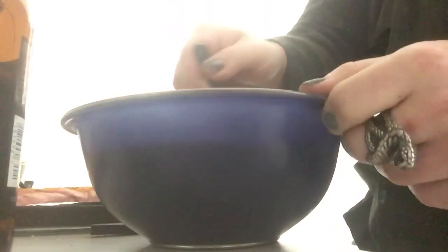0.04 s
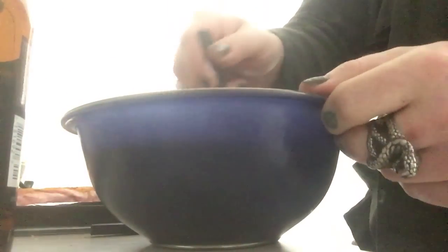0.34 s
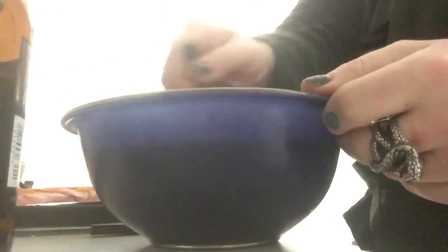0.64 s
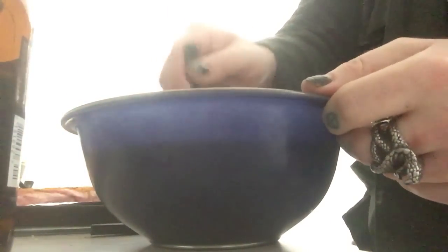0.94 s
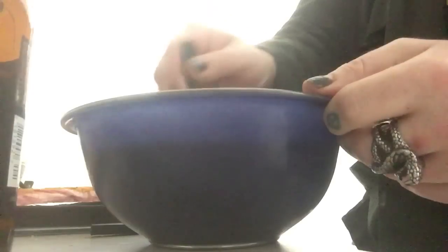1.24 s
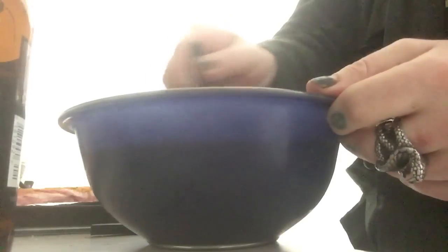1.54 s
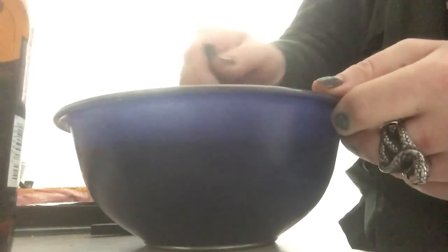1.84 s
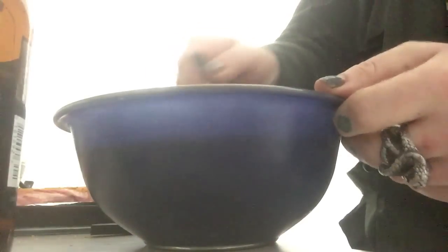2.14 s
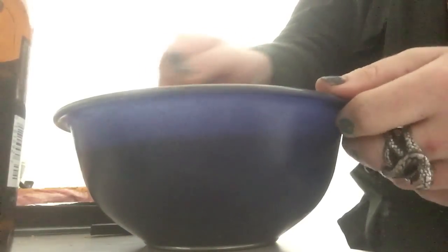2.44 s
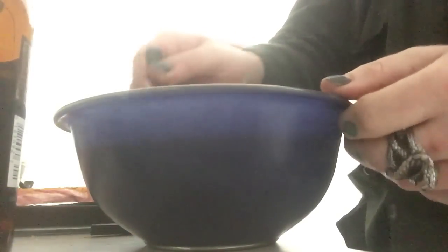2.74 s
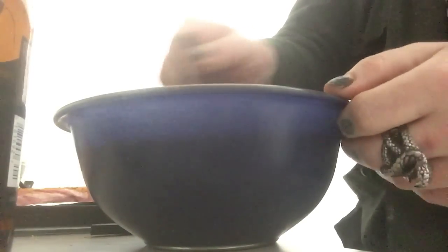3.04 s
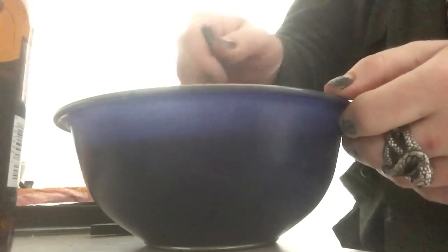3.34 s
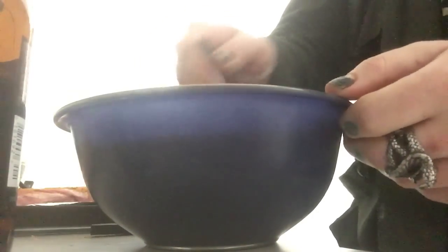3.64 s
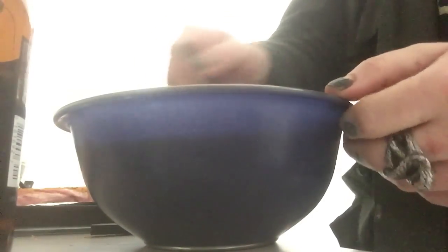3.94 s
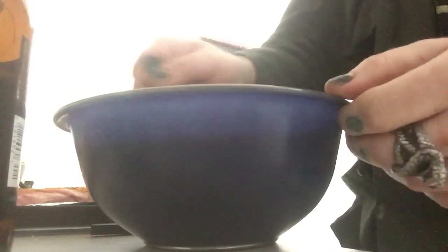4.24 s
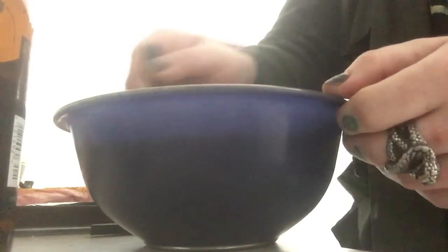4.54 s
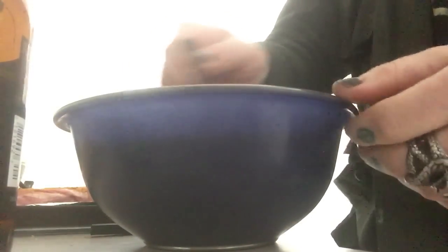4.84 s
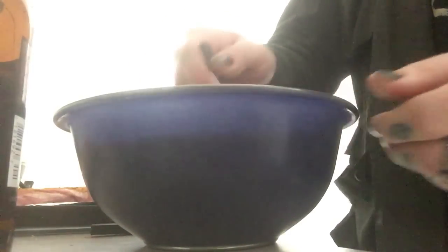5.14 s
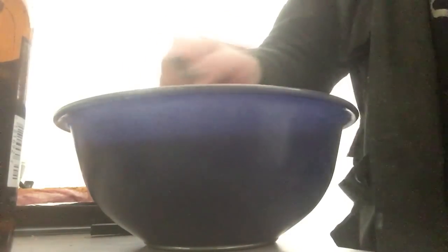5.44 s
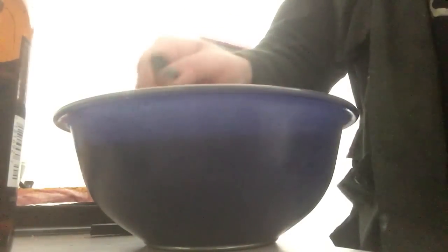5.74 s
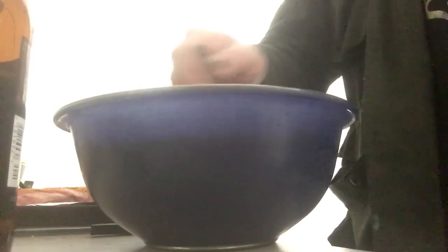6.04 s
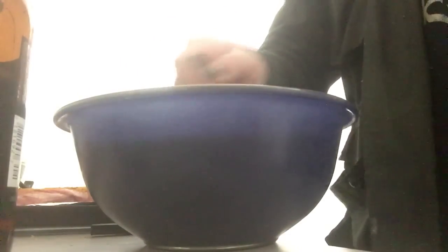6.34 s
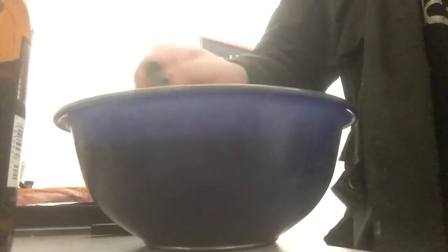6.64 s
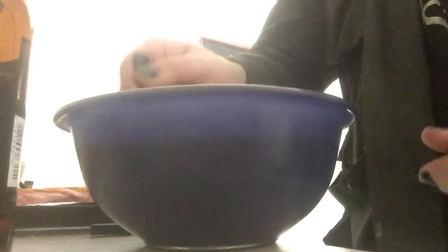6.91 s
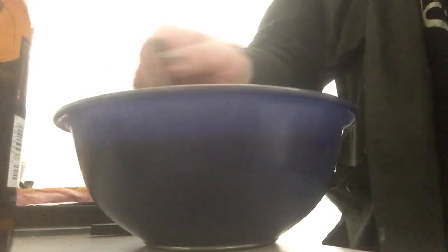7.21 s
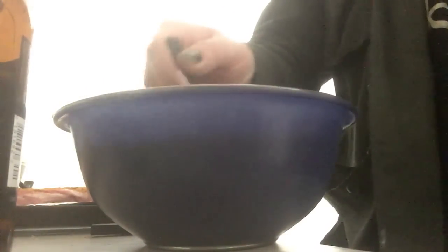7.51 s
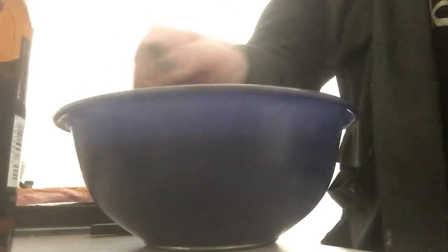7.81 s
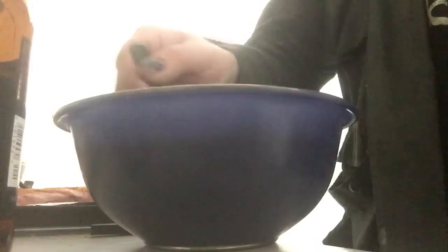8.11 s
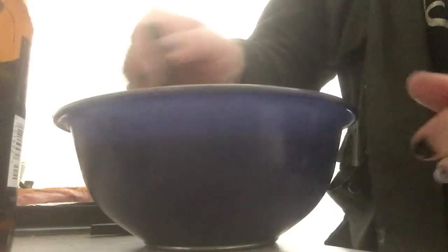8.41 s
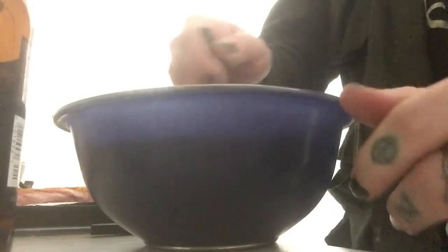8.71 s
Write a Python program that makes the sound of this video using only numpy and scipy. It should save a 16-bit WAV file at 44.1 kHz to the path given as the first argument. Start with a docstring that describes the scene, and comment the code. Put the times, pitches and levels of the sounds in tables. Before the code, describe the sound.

A metal utensil stirs sauce in a plastic mixing bowl, close to the microphone in a small kitchen. A few faint taps come first, then the level jumps and the utensil knocks unevenly against the wall several times a second. Soft wet scrapes run between the knocks, and the bowl thumps lightly on the counter. Later the knocks get a little deeper and sparser, with small plops, over a faint appliance hum.

```python
"""A metal utensil stirs sauce in a plastic mixing bowl on a kitchen counter, close to the microphone.
Several times a second it knocks on the wall, then drags through the wet sauce, slowing as it goes.
The bowl thumps on the counter, air pockets plop and the sauce pops wetly. Behind it an appliance
hums in the small room. Everything is faint at first, until the level steps up."""
import sys
import numpy as np
from scipy import signal
from scipy.fft import rfft, irfft
from scipy.io import wavfile

SR = 44100
rng = np.random.default_rng(int(sys.argv[2]) if len(sys.argv) > 2 else 0)


def dump(signal):
    """Clip the signal to [-1, 1] and save it as 16-bit WAV at the path in sys.argv[1]."""
    limited = np.clip(np.atleast_2d(signal).T, -1, 1)
    pcm = np.round(limited * 32767).astype(np.int16)
    wavfile.write(sys.argv[1], SR, pcm)


N = 386757
TIME = np.arange(N) / SR
AGE = np.arange(SR // 3) / SR  # seconds into one short sound
LEVEL_STEP_S = 1.36  # the level steps up and the drag becomes audible

# The bowl's wall ringing on after a blow. Each row: pitch in Hz, level in dB, t60 in seconds.
WALL_RING = [(690, -29, 0.092), (840, -43.5, 0.058), (1066, -12, 0.033), (1156, -10.5, 0.032),
             (1213, -33.5, 0.08), (1430, -29, 0.1), (2160, -61, 0.11)]
# The tone of the rubbed wall. Each row: frequency in Hz, relative level in dB.
RUB_SPECTRUM = [(100, -36), (250, -5), (500, -4.5), (700, 4.5), (950, 5.5), (1200, 4.5), (1550, -5.5),
                (2200, -7.5), (3500, -17), (7000, -53.5)]


def gain_of(db):
    """Decibels to amplitude."""
    return 10 ** (np.asarray(db) / 20)


def unit_rms(x):
    """Scales to rms 1."""
    return x / np.sqrt(np.mean(x ** 2) + 1e-20)


def value_at(points, hz):
    """Reads a table on a log-frequency axis."""
    freqs, values = np.transpose(points)
    return np.interp(np.log(hz + 1), np.log(freqs + 1), values)


def add(mix, start_s, sound):
    """Mixes a sound in at its start time."""
    part = mix[max(round(start_s * SR), 0):][:len(sound)]
    part += sound[:len(part)]


def colour(x, spectrum, size=4096):
    """Causal filter of unit energy, so that clicks keep their sharp front."""
    log_gain = np.log(gain_of(value_at(spectrum, abs(np.fft.fftfreq(size, 1 / SR)))))
    minimum_phase = np.exp(np.conj(signal.hilbert(log_gain)))
    response = np.fft.ifft(minimum_phase).real[:size // 2]
    return signal.oaconvolve(x, response / np.linalg.norm(response))[:len(x)]


def drift(below_hz):
    """A random wander of rms 1."""
    band = np.fft.rfftfreq(N, 1 / SR) < below_hz
    return unit_rms(irfft(rfft(rng.standard_normal(N)) * band, N))


def grains(per_s, spread_db):
    """Random tiny clicks, most weak and a few strong."""
    size = gain_of(spread_db * np.minimum(rng.exponential(1, N), 4))
    return unit_rms(size * rng.choice([-1, 1], N) * (rng.random(N) < per_s / SR))


def room_tone():
    """Kitchen air and a wavering appliance hum, both faint at first, over a steady hiss."""
    # The air of the room. Each row: frequency in Hz, relative level in dB.
    air_spectrum = [(20, -41), (40, 2.5), (70, 13), (135, -3.5), (190, -10.5), (320, -12), (600, -5),
                    (1150, -39), (1700, -32), (3300, -23), (5000, -30.5), (9000, -34.5), (11000, -35.5),
                    (16000, -36)]
    # The appliance. Each row: pitch in Hz, rms level in dB after the step up.
    hum_tones = [(59.6, -57), (129.5, -64)]
    air = gain_of(-56.5) * unit_rms(colour(rng.standard_normal(N), air_spectrum))
    hum = sum(gain_of(db) * np.sqrt(2) * np.sin(2 * np.pi * hz * TIME + 0.56 * drift(8.5))
              for hz, db in hum_tones)
    step_db = np.interp(TIME, [LEVEL_STEP_S, LEVEL_STEP_S + 0.0049], [-22, 0])
    hiss = gain_of(-79) * colour(rng.standard_normal(N), [(1200, 1), (4000, -8), (16000, -20)])
    return (air + hum) * gain_of(step_db) + hiss


def ring(modes, rise_cycles, detune=0):
    """Dying modes swell over their first cycles, so deep ones lag; the spot struck shifts their levels."""
    stretch = 1 + detune * rng.standard_normal() if detune else 1
    out = 0
    for (hz, db, t60), spot_db in zip(modes, rng.standard_normal(len(modes))):
        turns = hz * stretch * AGE
        swell = 1 - np.exp(-(turns / rise_cycles) ** 2)
        out = out + gain_of(db + spot_db - 60 * AGE / t60) * swell * np.sin(2 * np.pi * turns)
    return out


def wall_knock(centre_hz, focus_db_per_octave=13):
    """A few cycles of the wall: the depth of the blow picks out the modes near one pitch."""
    # The wall, heavily damped by sauce. Each row: pitch in Hz, level in dB, t60 in seconds.
    damped_wall = [(321, -10.5, 0.018), (679.6, 1.5, 0.011), (805.5, -1, 0.017), (1156, -2, 0.015)]
    modes = []
    for hz, db, t60 in damped_wall:
        octaves_away = min(abs(np.log2(hz / centre_hz)), 0.7)
        modes.append((hz, db - focus_db_per_octave * octaves_away, t60))
    wave = ring(modes, rise_cycles=0.95, detune=0.015)
    return wave / abs(wave).max()


def contact(snap_s, buzz_db, buzz_s):
    """Noise of hard contact: a first snap, then a weaker buzz."""
    envelope = np.exp(-AGE / snap_s) + gain_of(buzz_db) * np.exp(-AGE / buzz_s)
    return envelope * rng.standard_normal(len(AGE))


def utensil_taps():
    """Each blow gives a ringing knock, a crack of metal on plastic and a thump through the counter."""
    # Utensil meets bowl. Each row: start in seconds, level in dB, centre of the knock in Hz,
    # hardness in dB (the strength of the metal tick, low where sauce cushions the blow).
    blows = [(.158, -37, 1160, -23), (.433, -53.5, 1130, -36), (0.597, -55.5, 1080, -12),
             (.858, -39.5, 1230, -18), (.962, -43, 1160, -32), (1.101, -44, 1070, -32),
             (1.221, -40, 1220, -22.5), (1.26, -45, 1150, -35), (1.286, -52, 1120, -49),
             (1.369, -12, 980, -24.5), (1.505, -21.5, 1150, -41), (1.531, -16.5, 1060, -32.5),
             (1.721, -18.5, 890, -24.5), (1.791, -32, 1050, -54), (1.866, -12, 1240, -21),
             (1.978, -23, 1050, -24), (2.048, -26.5, 1080, -35), (2.177, -40, 900, -22),
             (2.234, -22, 1000, -21), (2.302, -21.5, 1050, -21), (2.372, -12.5, 1040, -21),
             (2.515, -21, 920, -21.5), (2.61, -20.5, 1080, -25), (2.666, -24.5, 1100, -25),
             (2.725, -19.5, 910, -22), (2.785, -23, 1040, -31), (2.965, -16, 810, -25),
             (2.998, -22, 1140, -29), (3.101, -26, 1200, -24), (3.221, -13.5, 840, -25.5),
             (3.279, -11, 1120, -23), (3.414, -39, 810, -13), (3.565, -8.5, 1130, -23.5),
             (3.734, -11.5, 910, -23), (3.796, -19, 1160, -30), (3.931, -27, 1060, -16.5),
             (4.037, -29, 860, -27), (4.106, -17.5, 1030, -24), (4.259, -20.5, 1010, -20),
             (4.496, -27, 1024, -23), (4.567, -26.5, 1160, -23), (4.76, -17.5, 855, -22),
             (4.785, -20, 1160, -29), (5.007, -16, 1010, -22), (5.038, -20.5, 1150, -22.5),
             (5.062, -24, 1130, -25), (5.119, -16.5, 1170, -25.5), (5.238, -15.5, 874, -22.5),
             (5.297, -21, 1040, -36), (5.367, -26.5, 1120, -28), (5.431, -22.5, 1020, -33),
             (5.473, -15, 740, -23.5), (5.504, -23.5, 1110, -34), (5.561, -27, 1060, -27.5),
             (5.597, -20, 1130, -29), (5.73, -16.5, 840, -18.5), (5.834, -20, 1040, -25),
             (5.861, -27, 1170, -21), (5.97, -15.5, 624, -19), (6.093, -11, 654, -19),
             (6.186, -17.5, 625, -17), (6.312, -6.5, 670, -20.5), (6.628, -12.5, 844, -26.5),
             (6.863, -13.5, 790, -21.5), (7.092, -14.5, 740, -21.5), (7.295, -25, 825, -29),
             (7.334, -18.5, 945, -22.5), (7.4, -21, 930, -38), (7.631, -22.5, 760, -22.5),
             (7.842, -15, 940, -25), (7.966, -26, 1100, -28), (8.134, -19, 900, -24.5),
             (8.411, -10.5, 1100, -20), (8.684, -26.5, 1160, -20), (8.738, -30.5, 1150, -36.5)]
    # The utensil's own ring. Each row: pitch in Hz, level in dB, t60 in seconds.
    shaft_modes = [(8030, -21.5, 0.13)]
    # The bowl rocking on the counter. Each row: pitch in Hz, level in dB, t60 in seconds.
    counter_modes = [(66.5, -2.5, 0.26), (90.8, 2, 0.2), (128.2, 2.5, 0.23), (225, -4, 0.1)]
    # Struck plastic. Each row: frequency in Hz, relative level in dB.
    clack_spectrum = [(500, 0.5), (1300, -8), (1900, 1), (2500, -1), (3300, -5), (4500, -17.5), (8000, -29)]
    # The metal tip. Each row: frequency in Hz, relative level in dB.
    tick_spectrum = [(2000, -12.5), (3600, 1.5), (5400, 0.5), (7000, -1), (8000, -4.5), (9200, -1.5),
                     (10500, -13.5), (13500, -11.5), (16000, -19)]
    typical_db, typical_hardness_db = -20, -24
    knocks, clacks, ticks, thumps = np.zeros((4, N))
    for start, db, centre_hz, hardness_db in blows:
        # With this floor the quiet taps before the level steps up keep the tone of ordinary taps.
        force_db = max(db - typical_db, -10)
        # The plastic clacks most in hard, light taps; heavy blows rock the bowl and ring the shaft.
        clack_db = -14 + 0.54 * (hardness_db - typical_hardness_db) - 0.32 * force_db
        thump_db = -25 + 0.091 * force_db + rng.standard_normal()  # the grip varies
        shaft_db = 0.7 * force_db + hardness_db
        after_ring = gain_of(7) * ring(WALL_RING, rise_cycles=3.7, detune=0.014)
        add(knocks, start, gain_of(db - 3) * (wall_knock(centre_hz) + after_ring))
        add(knocks, start, gain_of(db + shaft_db) * ring(shaft_modes, rise_cycles=1.8))
        clack = contact(snap_s=0.0011, buzz_db=-11.5, buzz_s=0.0056)
        tick = contact(snap_s=0.00081, buzz_db=-17, buzz_s=0.0052)
        thump = ring(counter_modes, rise_cycles=0.49, detune=0.051)
        add(clacks, start, gain_of(db + clack_db) * clack)
        add(ticks, start, gain_of(db + hardness_db + 4.5) * tick)
        add(thumps, start, gain_of(db + thump_db) * thump)
    cracks = colour(clacks, clack_spectrum) + colour(ticks, tick_spectrum)
    return knocks, cracks, thumps


def stirring(drag_db=-65, seep_db=-79):
    """The utensil sticks and slips on the wall as films of sauce tear; a faint drag links the strokes."""
    # Strokes through the sauce. Each row: start in seconds, length in seconds, rub in dB, fizz in dB.
    strokes = [(1.557, 0.15, -49.5, -98), (1.987, 0.064, -42.5, -61), (2.248, 0.07, -43, -61),
               (2.497, 0.21, -48, -67.5), (2.747, 0.17, -46.5, -58.5), (3.007, 0.17, -45.5, -62.5),
               (3.308, 0.04, -46, -59), (3.756, 0.055, -43, -59), (4.28, 0.13, -45.5, -58.5),
               (4.518, 0.12, -42.5, -59), (4.8, 0.08, -50.5, -60.5), (5.024, 0.041, -41, -68),
               (5.133, .06, -42, -74), (5.251, 0.074, -46, -63), (5.472, 0.052, -38.5, -60),
               (5.738, .17, -45, -61), (6.17, 0.16, -47.5, -63.5), (6.353, 0.36, -51, -64),
               (6.626, .1, -50.5, -65), (6.877, 0.11, -47, -64.5), (7.142, 0.12, -48, -63),
               (7.346, 0.086, -39, -58.5), (7.657, 0.089, -45, -58), (7.911, 0.073, -46, -56),
               (8.168, 0.042, -48.5, -63), (8.618, 0.115, -58, -63)]
    # Tearing sauce. Each row: frequency in Hz, relative level in dB.
    fizz_spectrum = [(1000, 4), (2200, -31), (3500, -0.5), (5000, -0.5), (9000, -3.5), (10500, -10),
                     (14000, -11.5), (16000, -32)]
    audible = TIME > LEVEL_STEP_S
    rub_power, fizz_power = np.zeros(N), gain_of(seep_db) ** 2 * audible
    for start, length_s, rub_db, fizz_db in strokes:
        strength = stroke_envelope(length_s)
        add(rub_power, start, (gain_of(rub_db) * strength) ** 2)
        add(fizz_power, start, (gain_of(fizz_db) * strength) ** 2)
    clumps = drift(70)  # rub and fizz flicker together
    rub = colour(grains(per_s=420, spread_db=4), RUB_SPECTRUM) * gain_of(3.63 * clumps - 4)
    fizz = colour(grains(per_s=860, spread_db=3.5), fizz_spectrum) * gain_of(2.9 * clumps + 2)
    rubbing = rub * np.sqrt(rub_power + gain_of(drag_db) ** 2 * audible)
    skipping = gain_of(-6) * wall_chatter(per_s=45) * np.sqrt(rub_power)
    wet = (fizz + gain_of(3) * tiny_bubbles(per_s=120)) * np.sqrt(fizz_power)
    return rubbing + skipping + wet


def blip(hz, decay_cycles):
    """A short wet ring that rises in pitch."""
    t = AGE[:SR // 25]
    turns = hz * t * (1 + 5 * t)
    return np.sin(2 * np.pi * turns) * np.exp(-turns / decay_cycles) * (1 - np.exp(-turns))


def tiny_bubbles(per_s, sizes=20):
    """Tiny bubbles of many sizes burst at random; the thick sauce keeps each ring short."""
    out = np.zeros(N)
    for hz in np.geomspace(1150, 4200, sizes):
        bursts = grains(per_s / sizes, spread_db=2)
        out += signal.oaconvolve(bursts, blip(hz, decay_cycles=5))[:N]
    return unit_rms(out)


def stroke_envelope(length_s, rise_s=0.0096, sag_db_per_s=36, release_s=0.0063):
    """The sauce grips the utensil, slows it through the stroke, then lets it go."""
    rise = np.minimum(AGE / rise_s, 1)
    release = np.exp(-np.maximum(AGE - length_s, 0) / release_s)
    return rise * gain_of(-sag_db_per_s * AGE) * release


def wall_chatter(per_s, spots=6):
    """Light skips of the utensil ring the wall at slightly different spots."""
    out = np.zeros(N)
    for _ in range(spots):
        skip = ring(WALL_RING, rise_cycles=1.2, detune=0.063) * np.exp(-AGE / 0.0055)
        out += signal.oaconvolve(grains(per_s / spots, spread_db=3), skip)[:N]
    return unit_rms(out)


def air_plops(start_ratio=4.17, settle_cycles=0.565, peak_cycles=0.99):
    """A pocket widens behind the utensil, so its pitch dives; thick sauce stops it in a few cycles."""
    # Air pockets opening. Each row: start in seconds, level in dB, final pitch in Hz.
    pockets = [(1.949, -32.5, 400), (7.069, -28, 346), (7.305, -32, 313), (8.011, -29, 323),
               (8.546, -41, 205), (8.559, -48.5, 114)]
    gulps, spatter = np.zeros((2, N))
    for start, db, hz in pockets:
        cycles = hz * AGE
        turns = cycles + (start_ratio - 1) * settle_cycles * (1 - np.exp(-cycles / settle_cycles))
        swell = gain_of(db) * (cycles / peak_cycles * np.exp(1 - cycles / peak_cycles)) ** 2
        add(gulps, start, swell * np.sin(2 * np.pi * turns))
        add(spatter, start, swell * rng.standard_normal(len(AGE)))
    uneven_tearing = 1 + 0.2 * drift(660)
    return gulps * uneven_tearing + gain_of(-11) * colour(spatter, RUB_SPECTRUM)


def wet_pops():
    """Short wet pops, and one bright wet smack as the utensil strikes at 5.47 s."""
    # The pops and the smack. Each row: start in seconds, level in dB, starting pitch in Hz.
    pops = [(4.208, -48, 2280), (4.422, -44.5, 2000), (4.619, -40.5, 1890), (4.933, -48, 2350),
            (5.475, -26.5, 2515), (5.479, -30, 2850), (6.838, -45.5, 3290), (7.068, -45, 2730),
            (7.228, -47, 2030)]
    out = np.zeros(N)
    for start, db, hz in pops:
        add(out, start, gain_of(db) * blip(hz, decay_cycles=6.9))
    return out * (1 + 1.13 * drift(560))  # a fast flutter roughens each ring


def kitchen_reverb(x, patterns=12, changes_per_s=10):
    """The small room's diffuse tail; noise patterns crossfade so it stays smooth, without ringing tones."""
    # The room's decay. Each row: frequency in Hz, t60 in seconds.
    decay_times = [(100, 0.99), (500, 0.24), (1200, 0.27), (3000, 0.2), (8000, 0.2), (15000, 0.15)]
    out = np.zeros(N)
    for k in range(patterns):
        hz, t, noise = signal.stft(rng.choice([-1., 1.], SR // 2), SR, nperseg=256)
        decay = gain_of(-60 * t / value_at(decay_times, hz)[:, None])
        counter_rush = np.exp(-t / 0.0085)
        onset = 1 - np.exp(-(t / 0.0018) ** 2)
        tail = signal.istft(noise * (decay + counter_rush) * onset, SR, nperseg=256)[1]
        turn = (changes_per_s * TIME - k) % patterns - 1
        share = np.cos(np.pi / 2 * np.minimum(turn, 1))  # each pattern hands over smoothly to the next
        out += signal.oaconvolve(x * share, tail / np.linalg.norm(tail))[:N]
    return out


def scene():
    """The bowl up close, its first echoes, and the kitchen behind it, in mono."""
    # Surfaces near the bowl. Each row: delay in seconds, level in dB.
    reflections = [(0.0097, -27.5), (0.0181, -38), (0.0244, -22.5)]
    knocks, cracks, thumps = utensil_taps()
    sauce = stirring() + air_plops() + wet_pops()
    close = knocks + cracks + sauce
    out = close + thumps + room_tone()
    for delay_s, db in reflections:
        add(out, delay_s, gain_of(db) * close)
    into_room = gain_of(-7.5) * knocks + gain_of(0.5) * cracks + gain_of(-2) * sauce
    return (out + kitchen_reverb(into_room))[None]


def record(dry, low_cut_hz=38, high_cut_hz=16050):
    """A small microphone loses the deepest bass; the highest treble is cut off steeply."""
    low_cut = signal.butter(4, low_cut_hz, "highpass", fs=SR, output="sos")
    high_cut = signal.firwin(511, high_cut_hz, window=("kaiser", 9), fs=SR)
    return signal.oaconvolve(signal.sosfilt(low_cut, dry), high_cut[None], "same")


dry = scene()
out = record(dry)
dump(out)
```